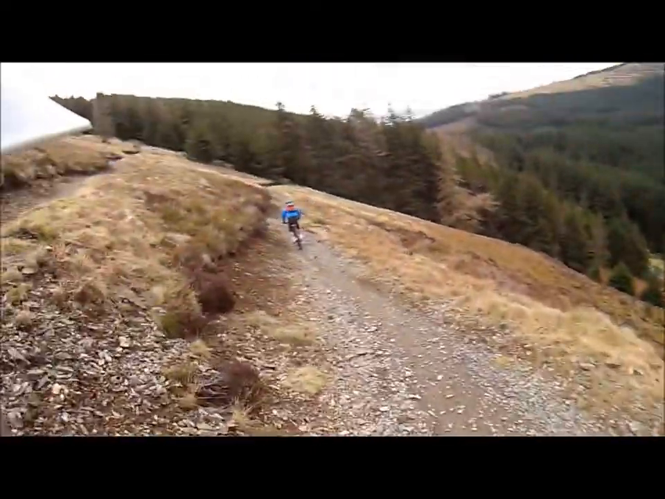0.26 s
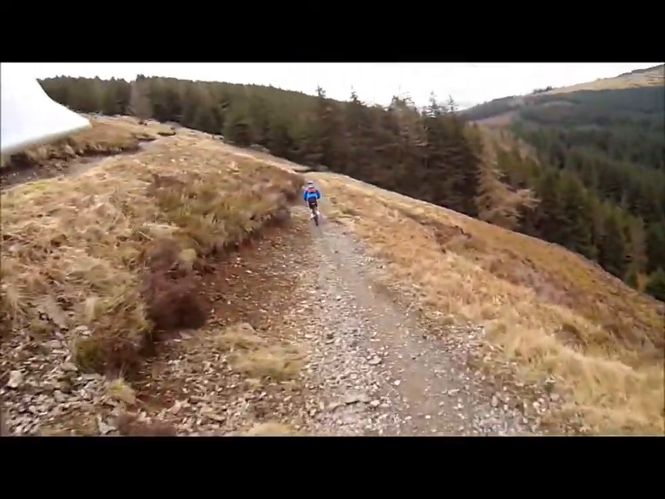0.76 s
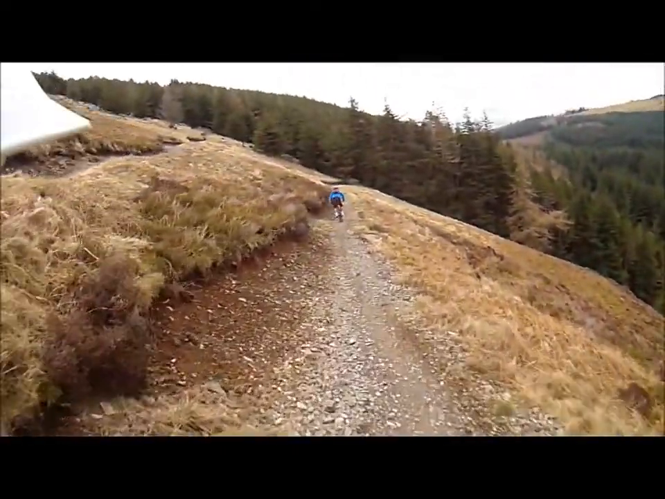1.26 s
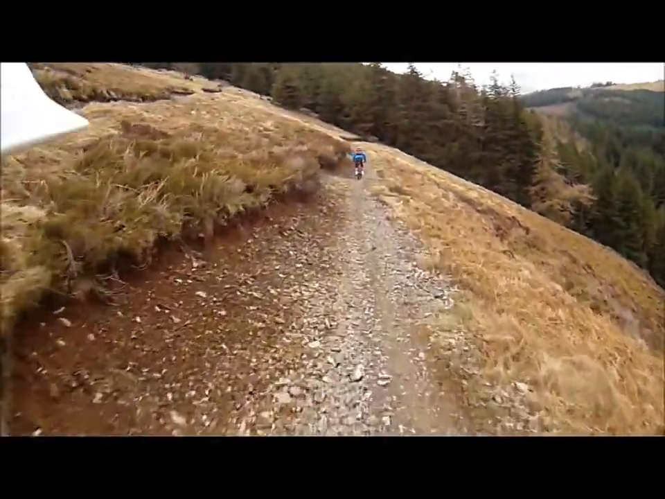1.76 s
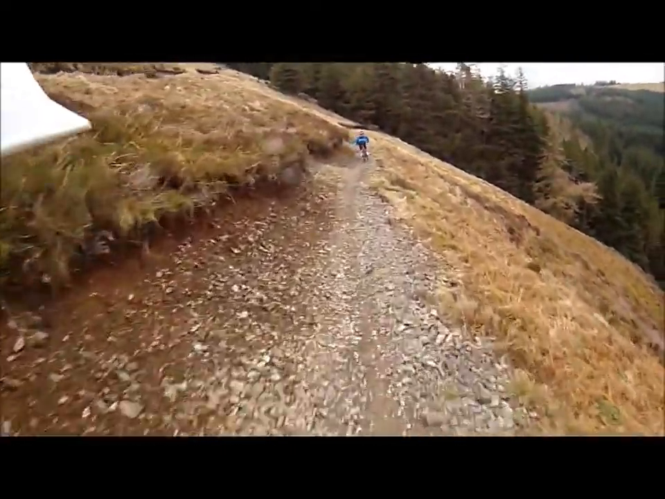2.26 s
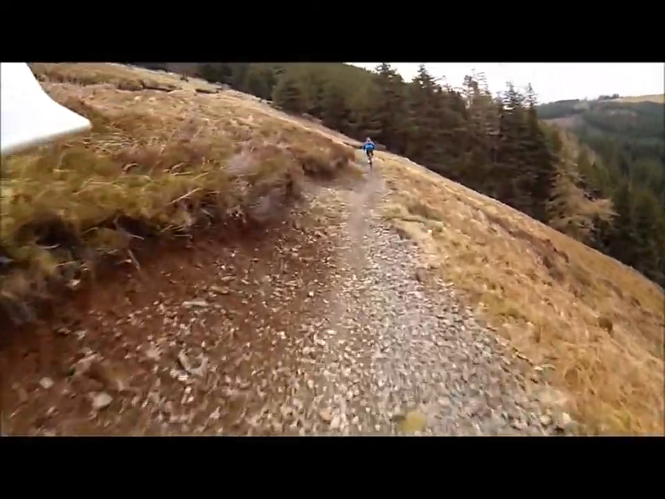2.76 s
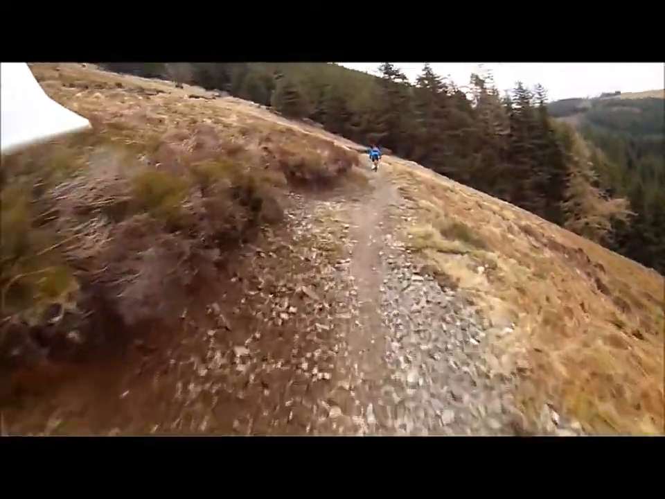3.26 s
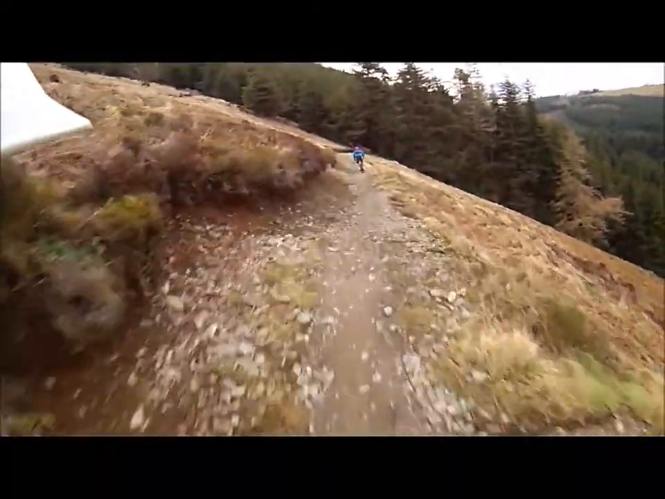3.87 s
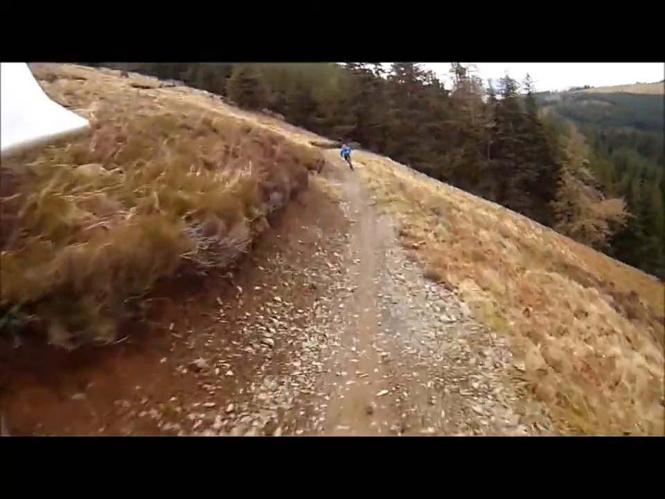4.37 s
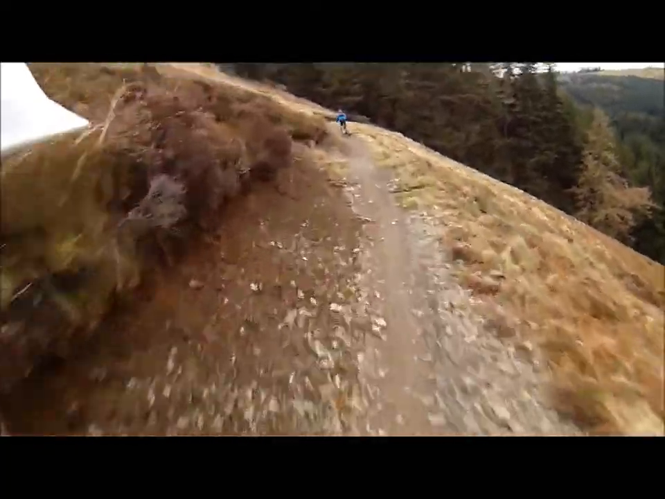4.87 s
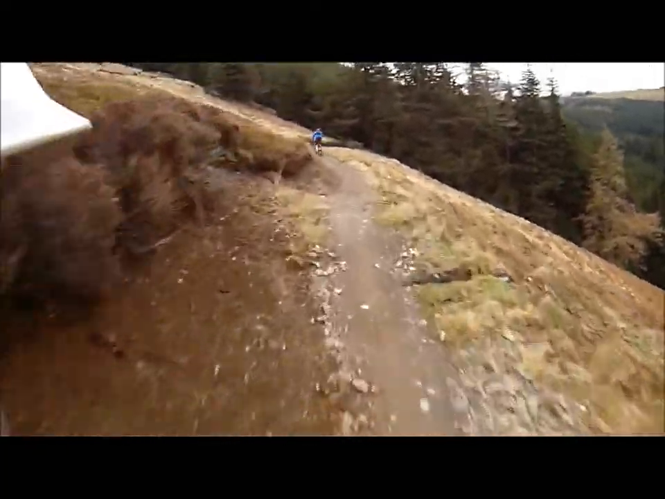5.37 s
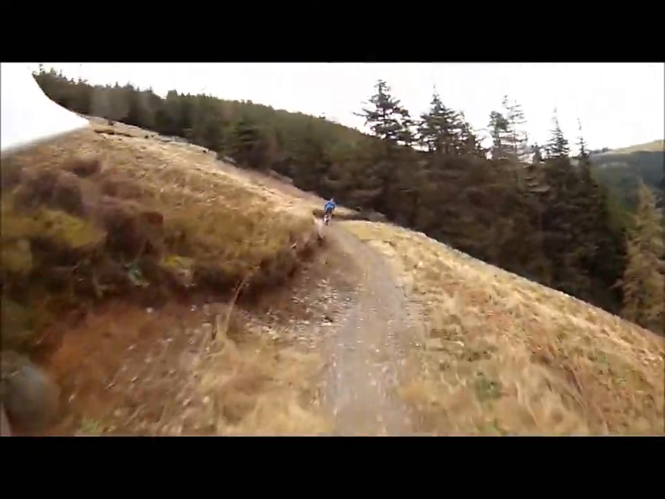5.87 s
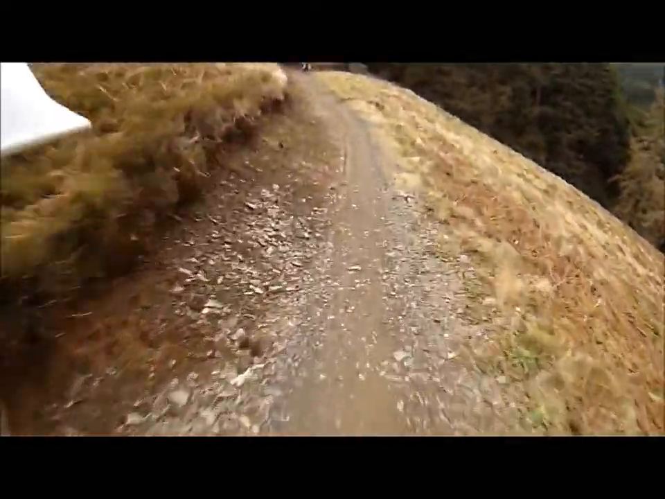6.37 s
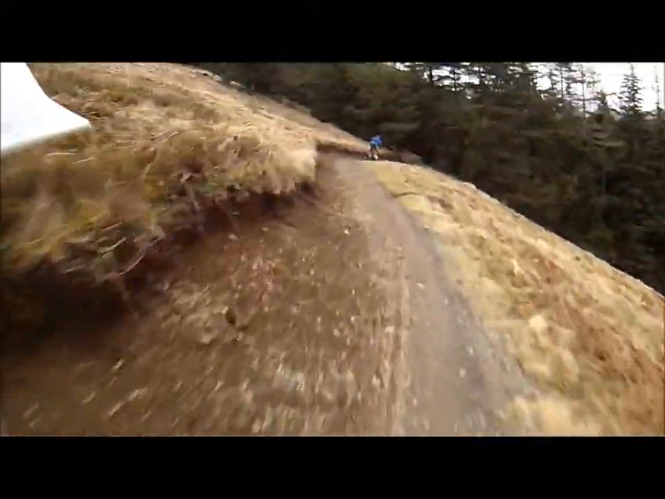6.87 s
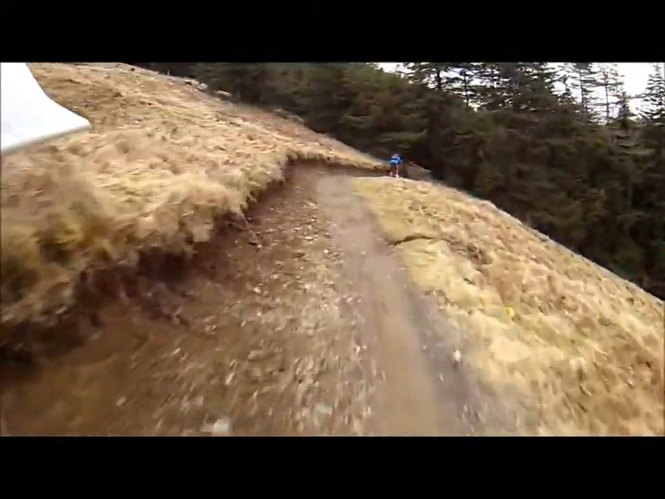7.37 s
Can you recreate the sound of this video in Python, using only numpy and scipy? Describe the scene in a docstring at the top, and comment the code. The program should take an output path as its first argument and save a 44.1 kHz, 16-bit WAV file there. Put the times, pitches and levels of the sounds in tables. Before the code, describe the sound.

Bike tyres crunch faster over a stony trail as the bike rattles, stones crack against the frame and wind buffets the microphone.

```python
"""Mountain bike on loose gravel

A bike gathers speed downhill, heard from a helmet camera. Tyres crunch, scrape and spray grit;
the bike knocks over bumps, metal parts chink, and three flung stones ring the frame.
Speed drives the faint freewheel and the rush of air. Gusts rumble on the microphone,
and dry grass brushes the wheels once."""
import sys
import numpy as np
from scipy import signal
from scipy.fft import rfft, irfft, next_fast_len
from scipy.io import wavfile
from scipy.ndimage import uniform_filter1d

SR = 44100
rng = np.random.default_rng(int(sys.argv[2]) if len(sys.argv) > 2 else 0)


def to_wav(s):
    """Save 16-bit WAV."""
    ch = np.atleast_2d(s).T  # columns
    pcm = np.round(np.clip(ch, -1, 1) * 32767)  # PCM
    wavfile.write(sys.argv[1], SR, pcm.astype(np.int16))


N = 336042
TIME_S = np.arange(N) / SR
HIT_S = TIME_S[:SR // 8]
TOP_HZ = 15800

# Tread grinding gravel. Each row: time in seconds, base level in dB.
CRUNCH_LEVEL = [(0.0, -64), (0.5, -67), (1.3, -67), (1.62, -61.5), (2.05, -58), (2.6, -60), (3.35, -55.5),
                (3.85, -55.5), (4.08, -53.5), (4.27, -59), (4.57, -63), (4.7, -52.5), (5.1, -52),
                (5.3, -50.5), (5.92, -61), (6.24, -63.5), (6.38, -55), (6.56, -54.5), (6.77, -50.5),
                (6.98, -51.5), (7.2, -55), (7.62, -54.5)]
# Bike speed. Each row: time in seconds, speed in m/s.
BIKE_SPEED = [(0, 3.53), (1.3, 3.2), (2.2, 3.57), (3.0, 6.7), (3.8, 7.3), (5.2, 7.54), (6.2, 9.3),
              (7.62, 8.7)]
# Gusts on the microphone. Each row: peak time in seconds, fade in seconds, peak in dB.
WIND_GUSTS = [(0.55, 0.18, -40.5), (0.79, 0.1, -39), (2.04, 0.51, -35), (2.58, 0.14, -35),
              (3.28, 0.59, -36), (3.94, 0.21, -27), (4.21, 0.24, -34.5), (4.76, 0.73, -27.5),
              (5.28, 0.49, -36), (5.95, 0.22, -30.5), (6.65, 0.4, -28)]
# Bumps and larger loose stones. Each row: start in seconds, peak in dB, pitch in Hz.
BUMP_KNOCKS = [(0.008, -41, 1440), (0.3436, -44, 1470), (0.7114, -46, 1670), (0.7176, -44, 1600),
               (0.954, -42.5, 1440), (0.9675, -39, 1600), (0.9999, -32, 1540), (1.656, -36.5, 1410),
               (1.805, -34.5, 1490), (1.889, -47, 1480), (1.9447, -41, 1660), (2.023, -43.5, 1460),
               (2.161, -31, 1560), (2.3255, -33, 1640), (2.384, -37.5, 1440), (2.597, -42, 1620),
               (2.695, -37.5, 1680), (2.9104, -43, 1510), (2.923, -36.5, 1610), (3.045, -25, 1720),
               (3.186, -37, 1570), (3.2767, -36.5, 1540), (3.392, -32.5, 1510), (3.446, -36, 1490),
               (3.749, -36, 1750), (3.9747, -33, 1620), (3.9794, -32.5, 1550), (4.061, -38, 1540),
               (4.1108, -31, 1260), (4.49, -38, 1370), (4.8836, -34, 1670), (4.952, -27.5, 1580),
               (5.0494, -29, 1480), (5.1006, -39, 1470), (5.110, -34.5, 1570), (5.164, -26, 1750),
               (5.3367, -31.5, 1440), (5.3807, -13.5, 1830), (5.477, -36, 1330), (5.543, -33.5, 1460),
               (5.6175, -38.5, 1450), (6.0123, -34.5, 1300), (6.6891, -34, 1440), (6.765, -34.5, 1560),
               (6.779, -29.5, 1490), (6.789, -33, 1420), (7.068, -29.5, 1410), (7.1757, -35.5, 1420),
               (7.3809, -36, 1560)]
# Chips on rims and spokes. Each row: start in seconds, peak in dB, pitch in Hz.
CHIP_TICKS = [(0.184, -49, 4700), (1.196, -57, 5200), (1.2005, -53, 6500), (2.009, -47, 5100),
              (2.385, -46.5, 4600), (2.6247, -51.5, 6000), (3.098, -47, 5200), (3.4933, -55, 5800),
              (4.054, -46, 4530), (4.687, -42, 5500), (4.8213, -34.5, 5870), (4.9587, -47, 6200),
              (5.0502, -38, 5070), (5.1605, -43, 7800), (5.171, -40, 7000), (5.319, -52, 7200),
              (5.475, -47.5, 6940), (5.544, -50, 6750), (6.639, -53, 8500), (6.791, -45, 8050),
              (7.068, -44.5, 4180), (7.437, -48, 9500)]
# Chain, spokes and brakes. Each row: start in seconds, peak in dB, pitch in Hz.
METAL_CHINKS = [(0.239, -60, 3070), (1.358, -48, 1960), (3.097, -46.5, 4410), (5.443, -62, 10650),
                (6.493, -54.5, 11100), (6.636, -55.5, 10600)]
# Sideways tyre slips. Each row: start in seconds, peak in dB, length in seconds.
TYRE_SCRAPES = [(0.267, -53.5, 0.087), (1.663, -57, 0.17), (2.057, -52, 0.05), (3.15, -56, 0.13),
                (3.72, -50.5, 0.042), (3.886, -49, 0.042), (4.274, -52, 0.09), (5.889, -52, 0.11)]
# Loose heaps under the tread. Each row: start in seconds, peak in dB.
HEAP_SCRUNCHES = [(0.290, -42.5), (0.308, -45.5), (0.695, -52.5), (1.521, -45), (1.921, -49), (2.895, -46),
                  (3.16, -38), (3.263, -47), (3.424, -38.5), (3.565, -39), (3.733, -47), (4.677, -39.5),
                  (5.019, -40), (5.094, -37.5), (5.158, -34), (5.666, -39), (5.834, -38), (6.375, -38.5),
                  (6.402, -40.5), (6.755, -42), (6.778, -40)]
# Grit thrown off the tyres. Each row: start in seconds, peak in dB, T60 in seconds.
GRIT_SPRAYS = [(2.004, -44.5, 0.021), (2.0967, -41, 0.07), (2.163, -39, 0.038), (2.325, -40, 0.029),
               (3.096, -36.5, 0.09), (3.113, -42, 0.035), (3.274, -42, 0.045), (3.391, -35.5, 0.035),
               (3.477, -41.5, 0.021), (3.493, -40.5, 0.018), (3.629, -32.5, 0.052), (4.689, -35.5, 0.079),
               (4.738, -41, 0.027), (5.17, -34.5, 0.023), (5.187, -41, 0.087), (6.338, -36.5, 0.04),
               (6.39, -44, 0.03), (6.434, -41, 0.056), (6.492, -42, 0.069), (6.79, -43, 0.025),
               (7.001, -35, 0.02)]
# Bedded rocks, and the suspension bottoming out in a dip. Each row: start in seconds, peak in dB, pitch in Hz.
THUDS = [(3.013, -38, 610), (4.102, -35, 410), (4.101, -37, 132), (6.043, -37.5, 890),
         (6.070, -30, 45.3)]
# Stones on the frame. Each row: start in seconds, peak before soft clipping in dB, low and high edges
# in Hz, band missed at that spot in Hz, stone's ring in Hz, its relative level in dB, tick peak in dB.
STONE_STRIKES = [(3.6622, 4, 1210, 14000, 1030, 2870, -9, -46),
                 (4.101, -8, 810, 3450, 2410, 1570, 6.5, -66),
                 (7.013, 0.5, 2000, 7730, 3800, 2080, 12, -19)]
# Frame resonances. Each row: frequency in Hz, T60 in seconds, relative level in dB.
FRAME_MODES = [(832, 0.027, -7), (1223, 0.011, 5), (1665, 0.0052, 6), (2110, 0.017, -14.5),
               (2850, 0.0038, 10.5), (3730, 0.0077, 2.5), (4480, 0.0063, -1.5), (6550, 0.004, -8.5),
               (10030, 0.012, -16)]

# Source spectra. Each row: frequency in Hz, relative density in dB.
CRUNCH_SPECTRUM = [(400, -51), (700, -23.5), (1000, -7.5), (1300, 1.5), (1550, 3), (2000, -6),
                   (2500, -12.5), (2900, -9.5), (3350, -25), (4000, -17), (6000, -53.5), (14000, -59)]
GRIT_SPECTRUM = [(2000, 4), (3400, -13), (4050, 4.5), (5000, -3.5), (6000, -15), (7200, -3.5), (8600, -10),
                 (9600, -7), (11000, -22), (15000, -54)]
BUFFET_SPECTRUM = [(3, -5.5), (8, -5.5), (14, 2), (24, -1), (36, -12.5), (60, -21.5), (100, -34.5),
                   (200, -89), (3000, -130)]
RUSH_SPECTRUM = [(30, -13), (70, 4.5), (108, -3), (152, -0.5), (205, -9.5), (280, -11.5), (450, -20),
                 (650, -25), (1500, -15.5), (15000, -63)]
PAWL_SPECTRUM = [(1500, -0.5), (3000, 2.5), (3500, -12), (4000, 2.5), (5000, -9.5), (6000, -10), (7100, 0),
                 (7600, -6.5), (8100, -6.5), (8700, -8), (9400, -8.5), (10500, -19.5), (15000, -21)]
SCRAPE_SPECTRUM = [(1500, -27), (2800, 2), (3400, -2), (4100, 4), (5800, -6), (7500, -4), (10000, -19),
                   (15000, -25)]
SPRAY_SPECTRUM = [(700, -8), (1500, 17), (3300, -1), (4200, 2), (5300, -6.5), (7300, -4), (10000, -18.5),
                  (15000, -34)]
GRASS_SPECTRUM = [(200, -2), (500, -4.5), (950, -1), (1500, -3.5), (2700, -8), (3400, -21), (4200, -27),
                  (7000, -36), (13000, -47)]
HISS_SPECTRUM = [(200, 13.5), (500, 11.5), (1000, -7.5), (4000, -7), (9000, -8.5), (16000, -6.5)]


def undb(db):
    """Decibels to gain."""
    return 10 ** (np.asarray(db) / 20)


def curve(table):
    """Linear interpolation of (time, value) rows over the scene."""
    return np.interp(TIME_S, *np.transpose(table))


def unit_rms(x):
    """Scale to rms 1."""
    return x / np.sqrt(np.mean(x ** 2))


def colour(x, spectrum):
    """Minimum-phase filter with the given (Hz, dB) outline."""
    size = next_fast_len(2 * len(x), True)
    size += size % 2
    hz, db = np.transpose(spectrum)
    bin_hz = np.arange(size // 2 + 1) * SR / size
    gain_db = np.interp(np.log(bin_hz + 1), np.log(hz), db)
    cepstrum = irfft(np.log(undb(gain_db)))
    cepstrum[1:size // 2] *= 2
    cepstrum[size // 2 + 1:] = 0
    return irfft(rfft(x, size) * np.exp(rfft(cepstrum)))[:len(x)]


def band(x, low_hz, high_hz, order=2):
    """Band-pass, upper edge capped at TOP_HZ."""
    sos = signal.butter(order, [low_hz, min(high_hz, TOP_HZ)], "band", fs=SR, output="sos")
    return signal.sosfilt(sos, x)


def notch(x, hz, q):
    """Remove one narrow band."""
    return signal.lfilter(*signal.iirnotch(hz, q, fs=SR), x)


def wander(rate_hz):
    """Random steps, slewed; rms 1."""
    hold = int(SR / rate_hz)
    steps = rng.standard_normal(N // 100)[np.arange(N) // hold]
    return unit_rms(uniform_filter1d(steps, hold))


def grains(per_s, spread_db, size=N):
    """Random clicks; positive spread makes a few louder, negative a few softer."""
    strength = undb(spread_db * np.minimum(rng.exponential(size=size), 4))
    occurs = rng.random(size) < per_s / SR
    return occurs * np.sign(rng.standard_normal(size)) * strength


def decay(t60_s):
    """Exponential envelope for one hit."""
    return undb(-60 * HIT_S / t60_s)


def swell(time_s, length_s):
    """Half-sine envelope."""
    return np.sin(np.pi * np.clip(time_s / length_s, 0, 1))


def scatter(x, tail_db, t60_s):
    """Direct sound plus a short smear off bike, rider and ground."""
    onset = 1 - np.exp(-HIT_S / 0.00051)
    tail = rng.standard_normal(len(HIT_S)) * decay(t60_s) * onset
    return x + undb(tail_db) * signal.fftconvolve(x, tail / np.linalg.norm(tail))[:len(x)]


def add(out, start_s, peak_db, sound):
    """Mix in a sound at the given peak level."""
    start = max(int(start_s * SR), 0)
    part = sound[:N - start]
    out[start:start + len(part)] += undb(peak_db) * part / np.abs(sound).max()


def gravel(crunch_db):
    """Stones and pebbles grind under the tread in uneven patches; fine grit crackles above."""
    patches = wander(rate_hz=45)
    pebbles = unit_rms(scatter(grains(per_s=70, spread_db=1.5), tail_db=-2, t60_s=0.04))
    grinding = unit_rms(scatter(grains(per_s=1600, spread_db=3), tail_db=-2, t60_s=0.035))
    crackle = unit_rms(scatter(grains(per_s=1200, spread_db=3.5), tail_db=-5, t60_s=0.021))
    crunch = unit_rms(colour(grinding + undb(-3.5) * pebbles, CRUNCH_SPECTRUM))
    grit = unit_rms(colour(crackle + undb(-1.5) * pebbles, GRIT_SPECTRUM))
    grit_db = -69 + 0.8 * (crunch_db + 55)  # follows the crunch, more gently
    return crunch * undb(crunch_db + 1.16 * patches) + grit * undb(grit_db + patches)


def wind(speed_m_s, cruise_m_s=7, gust_attack_s=0.2):
    """Large eddies buffet the microphone, hardest in gusts; small ones rush round the helmet."""
    excess_m_s = speed_m_s - cruise_m_s
    headwind_db = -43.5 + 0.2 * excess_m_s + 1.5 * wander(rate_hz=4.4)
    gusts = sum(undb(peak_db) * np.interp(TIME_S - peak_s, [-gust_attack_s, 0, fade_s], [0, 1, 0])
                for peak_s, fade_s, peak_db in WIND_GUSTS)
    buffet = unit_rms(colour(rng.standard_normal(N), BUFFET_SPECTRUM))
    rush = unit_rms(colour(rng.standard_normal(N), RUSH_SPECTRUM))
    rush_db = -54.5 + 1.74 * excess_m_s + 1.5 * wander(rate_hz=25)
    return buffet * np.hypot(undb(headwind_db), gusts) + rush * undb(rush_db)


def freewheel(speed_m_s, nominal_clicks_per_m=8, decay_s=0.0069, rms_db=-73):
    """Pawls drop over the ratchet, quicker with speed; shaking varies their timing and force."""
    jitter = np.exp(0.22 * wander(rate_hz=25))
    rate_hz = nominal_clicks_per_m * speed_m_s * jitter
    teeth = np.cumsum(rate_hz) / SR
    force_db = 2 * rng.standard_normal(N // 100)[teeth.astype(int)]
    since_drop_s = (teeth % 1) / rate_hz
    drops = rng.standard_normal(N) * np.exp(-since_drop_s / decay_s) * undb(force_db)
    return undb(rms_db) * unit_rms(colour(drops, PAWL_SPECTRUM))


def padded_ring(blow, hz):
    """A padded blow rings for a few cycles, with a faint smear."""
    ring = band(blow, hz * 0.85, hz * 1.102, order=1)
    ring = band(ring, hz * 0.62, hz * 1.46, order=4)
    return scatter(ring, tail_db=-12, t60_s=0.02)


def knocks():
    """The bike takes one padded blow per bump."""
    out, blow = np.zeros(N), signal.unit_impulse(len(HIT_S))
    for start_s, peak_db, hz in BUMP_KNOCKS:
        add(out, start_s, peak_db, padded_ring(blow, hz))
    return out


def rattle(crunch_db, relative_db=-14.5):
    """Light random knocks, louder on rougher trail."""
    blows = grains(per_s=10, spread_db=-2.5)
    return unit_rms(padded_ring(blows, hz=1460)) * undb(crunch_db + relative_db)


def ticks():
    """Lone chips hit rims and spokes: hard, bright clicks."""
    out, blow = np.zeros(N), signal.unit_impulse(len(HIT_S))
    for start_s, peak_db, hz in CHIP_TICKS:
        click = band(blow, hz * 0.66, hz * 1.15)
        add(out, start_s, peak_db, scatter(click, tail_db=-5, t60_s=0.016))
    return out


def chinks():
    """Metal parts touch and ring briefly, high and thin."""
    out = np.zeros(N)
    for start_s, peak_db, hz in METAL_CHINKS:
        contact = rng.standard_normal(len(HIT_S)) * decay(t60_s=0.047)
        add(out, start_s, peak_db, band(contact, hz * 0.916, hz * 1.01))
    return out


def scrapes():
    """Rubber slides over fine grit: a bright, grainy swish."""
    out, time_s = np.zeros(N), TIME_S[:SR // 4]
    for start_s, peak_db, length_s in TYRE_SCRAPES:
        clicks = grains(per_s=5000, spread_db=6, size=len(time_s)) * swell(time_s, length_s)
        add(out, start_s, peak_db, colour(clicks, SCRAPE_SPECTRUM))
    return out


def scrunches():
    """A heap of stones gives way: dense clicks swell and fade."""
    out = np.zeros(N)
    for start_s, peak_db in HEAP_SCRUNCHES:
        clicks = grains(per_s=3300, spread_db=6, size=len(HIT_S)) * swell(HIT_S, length_s=0.031)
        add(out, start_s, peak_db, colour(clicks, CRUNCH_SPECTRUM))
    return out


def sprays():
    """A chip hits the bike; finer clicks die away behind it."""
    out, chip = np.zeros(N), undb(3) * signal.unit_impulse(len(HIT_S), SR // 1000)
    for start_s, peak_db, t60_s in GRIT_SPRAYS:
        clicks = grains(per_s=4000, spread_db=3.5, size=len(HIT_S)) * decay(t60_s)
        add(out, start_s, peak_db, colour(clicks + chip, SPRAY_SPECTRUM))
    return out


def thuds():
    """Rubber on rock, or the suspension bottoming out: a low, short thump."""
    out, blow = np.zeros(N), signal.unit_impulse(len(HIT_S))
    for start_s, peak_db, hz in THUDS:
        thump = band(blow, hz * 0.69, hz * 1.34)
        add(out, start_s, peak_db, scatter(thump, tail_db=-15, t60_s=0.0054))
    return out


def stones(hollow_hz=3130, hollow_width_hz=220):
    """Hard contact rings frame and stone; its place and duration select the modes."""
    out = np.zeros(N)
    frame = sum(undb(db) * decay(t60_s) * np.cos(2 * np.pi * hz * HIT_S)
                for hz, t60_s, db in FRAME_MODES)
    tick = band(signal.unit_impulse(len(HIT_S)), 9600, 12000)
    for start_s, peak_db, low_hz, high_hz, missed_hz, ring_hz, ring_db, tick_db in STONE_STRIKES:
        stone = undb(ring_db) * decay(t60_s=0.0089) * np.cos(2 * np.pi * ring_hz * HIT_S)
        struck = band(frame + stone, low_hz, TOP_HZ, order=3)
        struck = notch(struck, missed_hz, q=4.3)
        # Thin tubes radiate little bass; contact time limits the top.
        radiated = band(struck, 700, high_hz, order=6)
        radiated = notch(radiated, hollow_hz, q=hollow_hz / hollow_width_hz)  # band not radiated
        add(out, start_s, peak_db, scatter(radiated, tail_db=-17, t60_s=0.0085))
        add(out, start_s, tick_db, tick)
    return out


def grass(peak_s=6.02, attack_s=0.21, release_s=0.11, level_db=-50):
    """Dry blades brush the wheels where the trail narrows."""
    contact = np.interp(TIME_S - peak_s, [-attack_s, 0, release_s], [0, 1, 0])
    blades = unit_rms(colour(grains(per_s=4000, spread_db=3.5), GRASS_SPECTRUM))
    return blades * undb(level_db) * contact


def scene():
    """Trail, bike and wind, in mono."""
    speed_m_s, crunch_db = curve(BIKE_SPEED), curve(CRUNCH_LEVEL)
    trail = gravel(crunch_db) + scrunches() + scrapes() + sprays() + ticks() + thuds() + grass()
    bike = knocks() + rattle(crunch_db) + stones() + chinks() + freewheel(speed_m_s)
    return (trail + bike + wind(speed_m_s))[None]


def record(dry):
    """The camera soft-clips the cracks, adds hiss and a thin whine, and cuts the top."""
    hiss_db, whine_db, whine_hz = -70.5, -81, 7639
    hiss = undb(hiss_db) * unit_rms(colour(rng.standard_normal(N), HISS_SPECTRUM))
    whine = undb(whine_db) * unit_rms(np.sin(2 * np.pi * whine_hz * TIME_S))
    lowpass = signal.ellip(10, 0.2, 70, TOP_HZ, fs=SR, output="sos")
    return signal.sosfilt(lowpass, np.tanh(dry) + hiss + whine)


dry = scene()
out = record(dry)
to_wav(out)
```